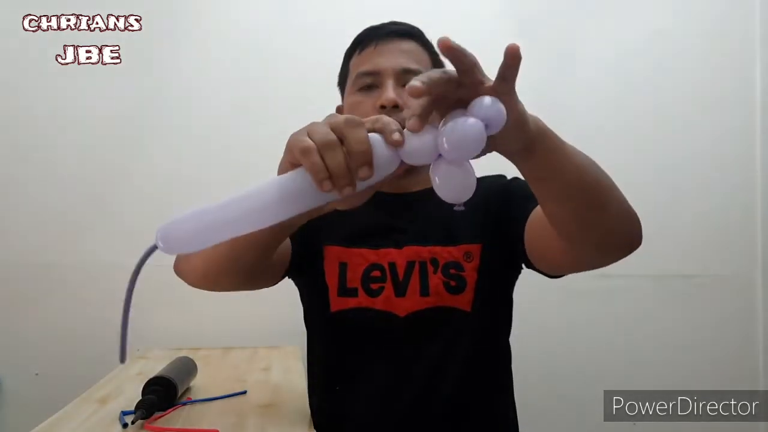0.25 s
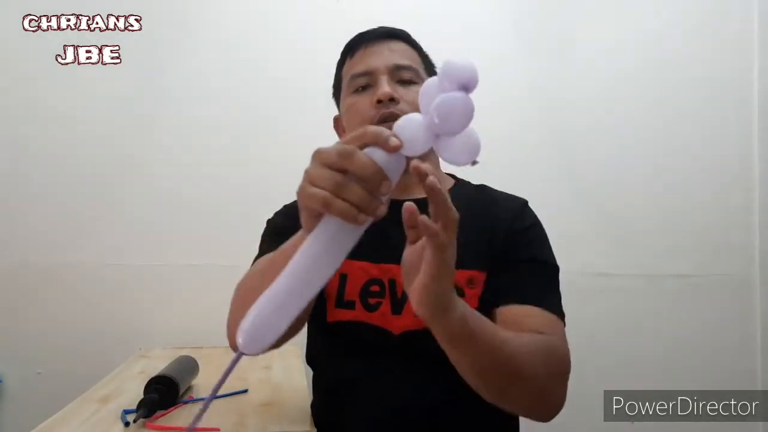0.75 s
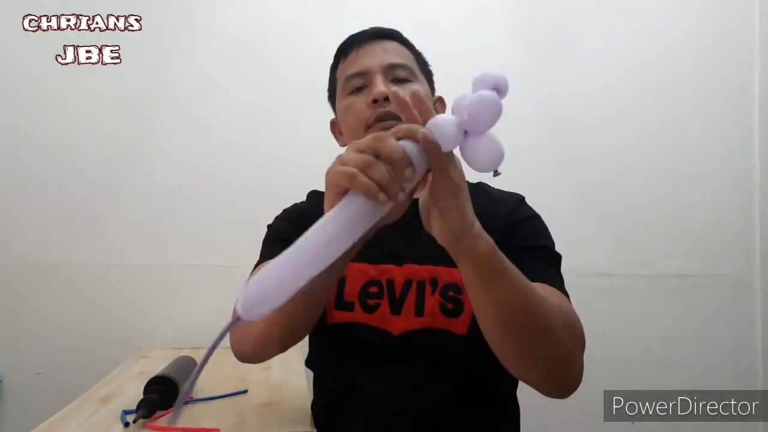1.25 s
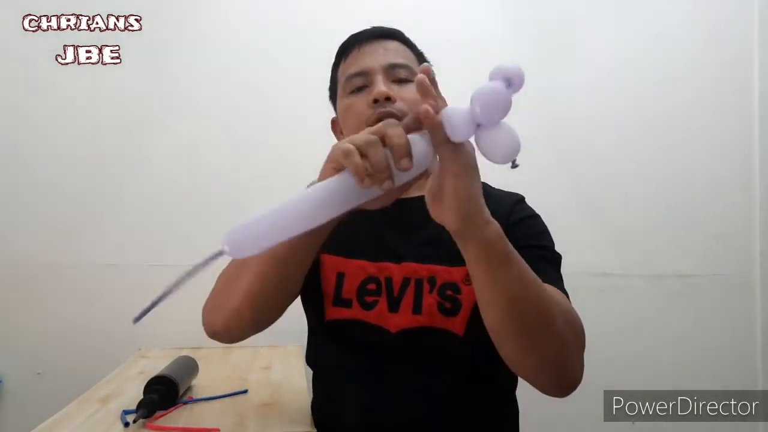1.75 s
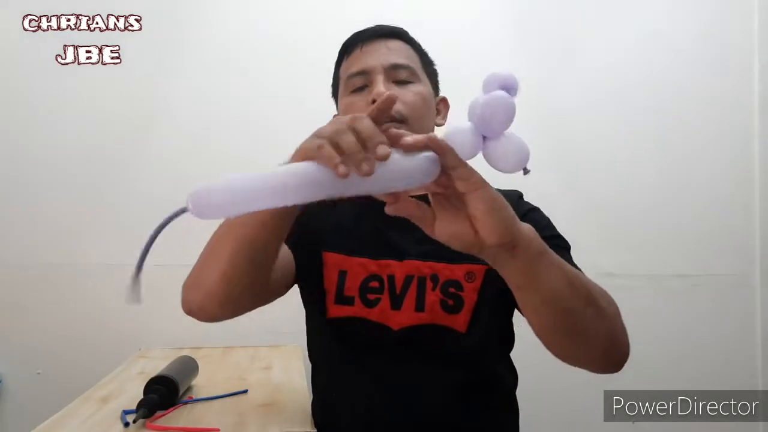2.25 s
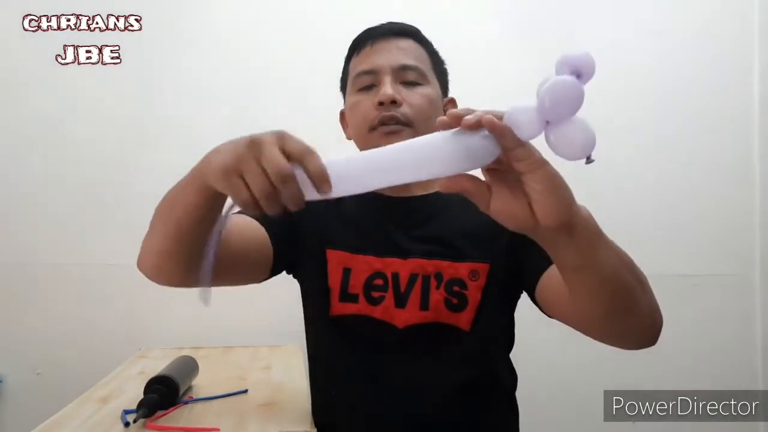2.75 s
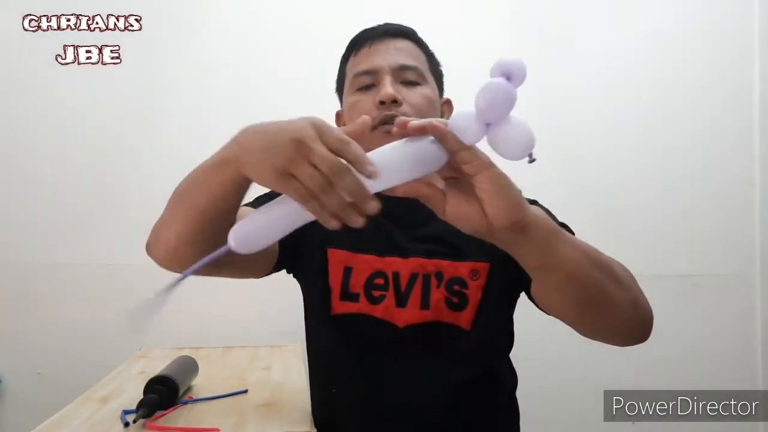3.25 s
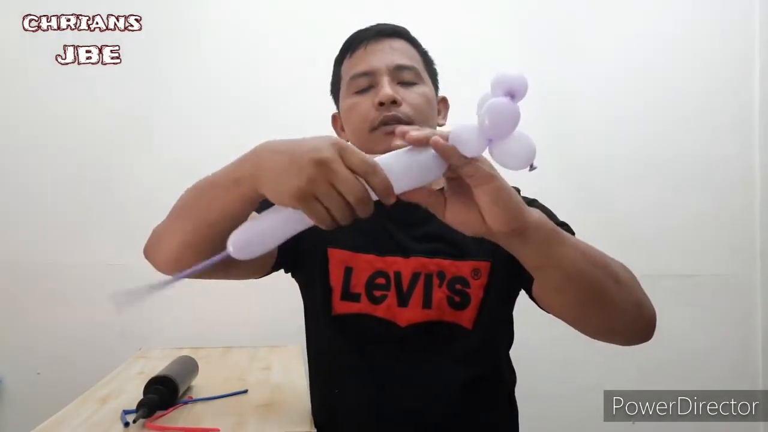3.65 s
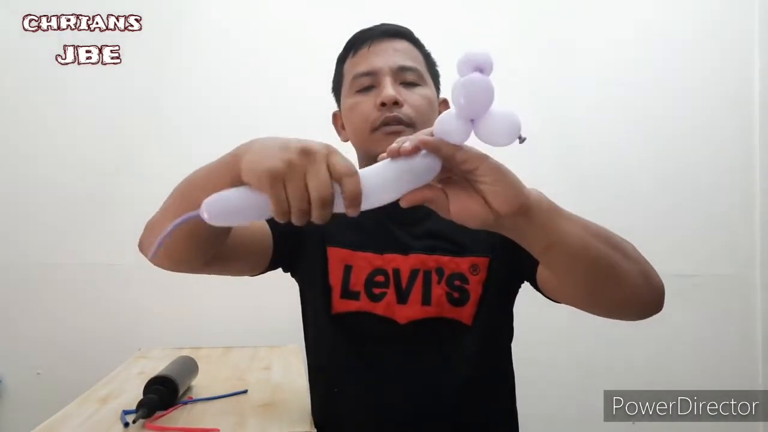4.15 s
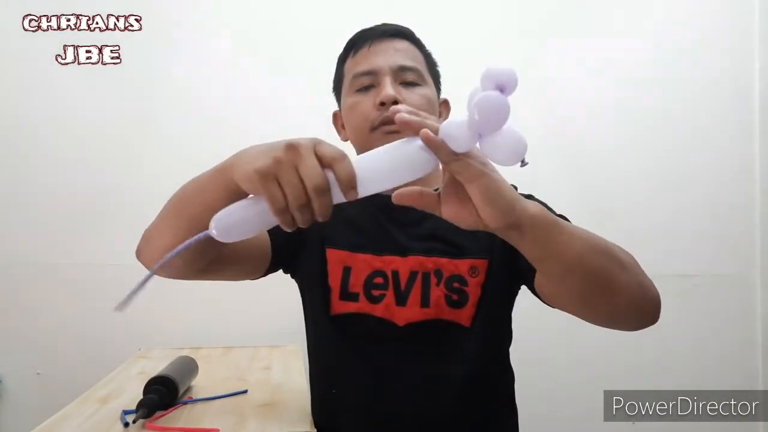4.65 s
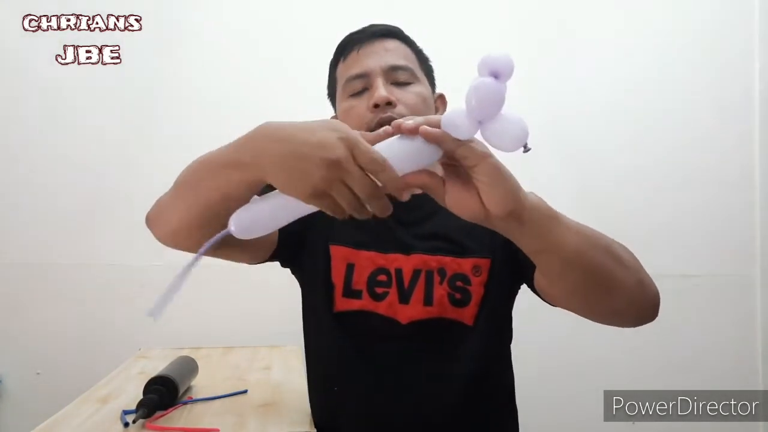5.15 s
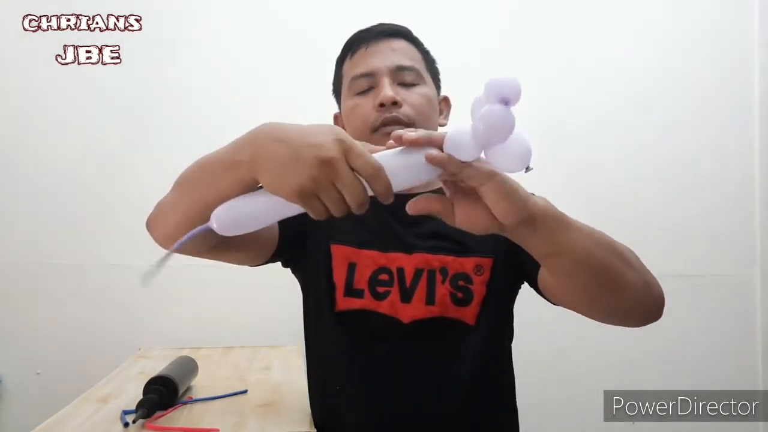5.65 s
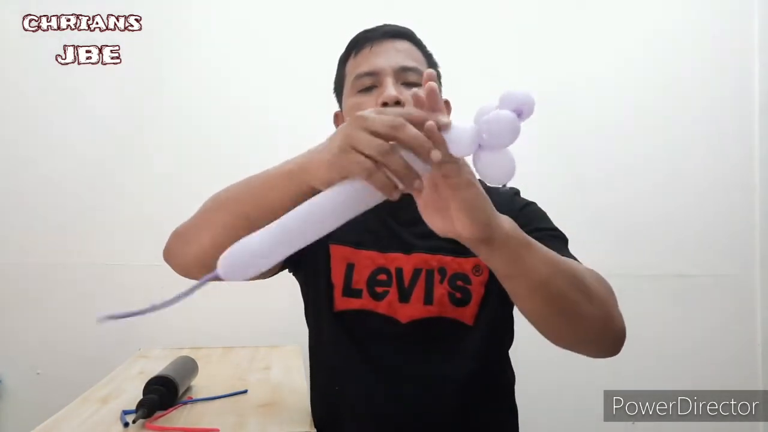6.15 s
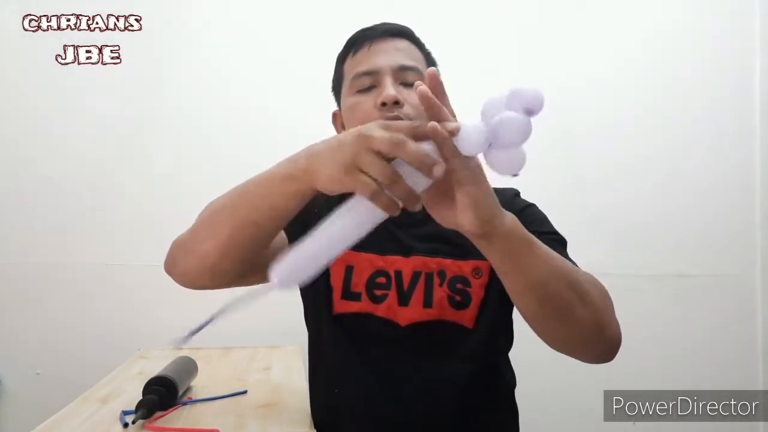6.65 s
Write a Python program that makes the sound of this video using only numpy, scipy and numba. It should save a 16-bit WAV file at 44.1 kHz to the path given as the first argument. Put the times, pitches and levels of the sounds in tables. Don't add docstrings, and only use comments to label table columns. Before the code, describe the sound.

Hands twist a long latex balloon in a small bare room, with irregular rubbery creaks, sharp snaps and brief squeaks over faint low hum.

```python
import sys
import numpy as np
from scipy import signal
from scipy.fft import rfft, irfft, next_fast_len
from scipy.io import wavfile
from scipy.ndimage import uniform_filter1d
from numba import njit

SR = 44100
rng = np.random.default_rng(int(sys.argv[2]) if len(sys.argv) > 2 else 0)


def inscribe(sig):
    pcm = np.round(np.clip(np.atleast_2d(sig).T, -1, 1) * 32767)
    wavfile.write(sys.argv[1], SR, pcm.astype(np.int16))


def makeup_ratio(level_db):
    decades = np.asarray(level_db, float) / 20
    return 10 ** decades


N = 303849
TIME = np.arange(N) / SR

# pitch_hz, level_db (per Hz)
HUM_SPECTRUM = [(24, -50.5), (40, -16.5), (57, -7), (87, -8), (107, -7), (124, -13.5), (172, -17),
                (212, -4.5), (256, -12), (332, -14), (419, -22), (625, -29), (687, -22), (773, -28.5),
                (11000, -45.5), (14300, -80.5), (22000, -120)]
HUM_DB = -64

# start_s, peak_db, bubble_hz, crack_db, treble_db
SNAPS = [(0.105, -22.5, 730, 14.5, 1), (0.386, -21, 834, 8, -9), (1.5, -35.5, 1266, 6.5, -11),
         (1.65, -23.5, 1210, 6.5, -11), (1.72, -15.5, 846, 15.5, -6.5), (1.7605, -10.5, 850, 9, -11),
         (1.893, -9.5, 790, 8.5, -14.5), (2.16, -30, 1290, 13.5, -38), (2.181, -22, 1220, 10, -19.5),
         (2.323, -31, 630, 17, -1.5), (2.362, -9, 740, 8.5, -13.5), (3.028, -14.5, 910, 3, -11),
         (3.467, -26.5, 790, 5.5, -22), (3.832, -18.5, 1056, 11.5, -10.5), (4.521, -19.5, 820, 6, -14),
         (4.547, -26.5, 865, 8.5, -5.5), (4.758, -29, 1190, -1, -18), (4.847, -22, 870, 9, -14.5),
         (5.234, -16.5, 820, 2.5, -34), (5.341, -6, 870, -2.5, -32.5), (5.604, -23, 960, 0, -31),
         (5.638, -16.5, 610, 5, -21.5), (6.676, -13.5, 790, 7, -20.5), (6.704, -14.5, 1130, -13, -32)]
# start_s, peak_db, bubble_hz, treble_db
TICKS = [(1.633, -42.5, 1400, -1), (2.196, -33.5, 860, -15), (2.349, -28, 1130, -1),
         (3.193, -31, 1240, -15.5), (3.301, -44, 786, -20), (3.379, -32.5, 740, -10.5),
         (3.447, -33, 636, -28), (3.794, -29, 900, -25), (4.331, -41.5, 815, -10), (4.896, -48, 850, -27),
         (5.151, -30, 815, -29), (6.213, -47.5, 810, -6.5), (6.307, -41, 1340, -14),
         (6.472, -41, 1000, -14), (6.608, -44, 1130, -22)]
TICK_CRACK_DB = 5.5
CRACK_HZ, CRACK_DB_PER_OCTAVE = 1605, 22.5
RING_CYCLES, RING_DB_PER_HALVING = 2.03, 18.5

# peak_s, rise_s, fall_s, peak_db, patch_hz
GRIPS = [(1.97, 0.15, 0.14, -25.5, 915), (2.372, 0.03, 0.031, -10.5, 1240),
         (3.055, 0.046, 0.045, -15, 1037), (3.382, 0.0045, 0.028, -36, 1280),
         (3.474, 0.043, 0.14, -32, 956), (3.59, 0.038, 0.017, -41.5, 790), (3.958, 0.019, 0.025, -15, 1750),
         (4.074, 0.0085, 0.014, -20, 800), (4.6, 0.084, 0.071, -36, 1156), (5.2, 0.053, 0.12, -29, 1143),
         (5.61, 0.012, 0.11, -34.5, 1100), (5.648, 0.0036, 0.043, -41, 873), (5.758, 0.022, .05, -24, 760),
         (6.4, 0.061, 0.21, -60, 800)]
# peak_s, rise_s, fall_s, peak_db, patch_hz
SLIPS = [(1.896, 0.00098, 0.0064, -14.5, 950), (2.078, .016, 0.023, -23, 1504),
         (2.162, 0.00067, 0.023, -24.5, 1980), (2.398, 0.017, 0.034, -15, 1250),
         (2.504, 0.032, 0.07, -29.5, 1850), (2.812, 0.023, 0.11, -28, 804), (2.97, 0.025, 0.042, -35, 820),
         (3.99, .01, .05, -34, 1800), (4.522, 0.00099, 0.0082, -33, 1170),
         (4.73, 0.057, 0.023, -46.5, 1167), (4.762, 0.0021, 0.04, -31.5, 1107),
         (4.852, 0.00284, 0.098, -24, 924), (5.938, 0.055, 0.032, -28, 1074),
         (6.703, .028, 0.073, -15.5, 1253), (6.87, .04, 0.087, -39.5, 1287)]
# peak_s, rise_s, fall_s, peak_db, patch_hz
SLIDES = [(1.29, 0.018, 0.054, -38, 1780), (1.35, 0.037, 0.085, -33.5, 1470),
          (1.505, 0.0043, 0.096, -44.5, 1750), (1.762, .002, 0.021, -13, 850),
          (1.8, 0.0088, 0.027, -22, 825), (2.184, 0.0028, 0.014, -26, 1940), (2.78, 0.016, .03, -30, 1610),
          (2.9, 0.076, 0.058, -15.5, 778), (3.842, .012, 0.14, -14.5, 1040),
          (4.25, 0.021, 0.08, -42.5, 830), (4.333, .003, 0.095, -39, 1030), (4.466, 0.038, 0.013, -50, 920),
          (5.41, 0.0064, .1, -31, 837), (5.802, 0.029, .1, -22, 803), (6.19, 0.04, 0.034, -45.5, 1640),
          (6.646, 0.042, 0.0071, -33, 1197), (6.763, 0.041, 0.037, -18, 1212)]
# peak_s, rise_s, fall_s, peak_db, patch_hz
BRUSHES = [
    (1.24, 0.057, 0.057, -44.5, 1200),
    (1.55, .05, 0.11, -51, 1750),
    (1.652, 0.0018, 0.046, -32, 1410),
    (2.73, .05, .04, -52.5, 1750),
    (3.8, 0.064, 0.09, -44.5, 1110),
    (6.1, 0.023, 0.13, -52.5, 1650),
    (6.35, .05, 0.14, -56, 1660),
    (6.5, 0.035, 0.14, -50, 1264),
]
# rubs (a table above), bass_db, broad_db, treble_db
TOUCHES = [
    (GRIPS, -3, -8, -13),
    (SLIPS, -2.5, -2, -0.48),
    (SLIDES, -26, -13, -13.5),
    (BRUSHES, -17, -6, 1.8),
]
# pitch_hz, width (over centre), level_db
TUBE_MODES = [(263.3, 0.13, -8), (513, .22, -5.5), (779, .2, -4.5)]
RISE_DB, FALL_DB = 13.5, 17
FLUTTER_DB = 2.5

# start_s, length_s, start_hz, end_hz, level_db
WAILS = [
    (2.355, 0.078, 338.5, 350.7, -25),
    (3.897, .075, 350.1, 335, -19.5),
]
# start_s, length_s, start_hz, end_hz, level_db
BUZZES = [
    (2.467, 0.018, 1774, 1810, -22),
    (2.497, 0.017, 1600, 1736, -20.5),
    (5.755, 0.05, 328, 341.3, -35),
    (6.683, 0.033, 569, 395, -24),
]
# start_s, length_s, start_hz, end_hz, level_db
SQUEAKS = [
    (1.906, 0.048, 520, 250, -33.5),
    (4.057, 0.012, 770, 798, -20.5),
    (3.955, 0.045, 300, 250, -26.5),
    (4.06, 0.024, 485, 475, -31.5),
    (6.768, 0.049, 1088, 990, -36),
]
# start_s, length_s, start_hz, end_hz, level_db
GROANS = [
    (2.791, 0.039, 197, 196, -31.5),
    (3.842, 0.027, 371, 350, -28.5),
    (5.607, 0.027, 264, 250, -38),
    (4.52, 0.03, 505, 470, -37),
    (4.665, 0.12, 412, 268.5, -49),
    (4.9, 0.1, 269, 245.5, -47.5),
    (5.01, 0.12, 226, 257, -52),
    (5.185, 0.045, 271, 257, -32.5),
    (6.63, 0.017, 1220, 1310, -39),
]
# slips (a table above), fall_db (per octave of overtones),
# arch (pitch arch per s of length)
VOICES = [
    (WAILS, 2.74, 2.2),
    (BUZZES, -3, 2.2),
    (SQUEAKS, -10.5, 0.41),
    (GROANS, -20.5, 0.26),
]
TOP_HZ = 15000

# pitch_hz, level_db
WALLS = [(2500, 0), (14000, -3)]
ROOM_T60_S, WALL_ECHO_S, PORT_LAG_S = 0.29, .0062, .00004
PLACE_HOLD_S = .23

# pitch_hz, level_db
MIC = [(100, -11), (300, 0), (5000, 0), (6500, -2), (8000, 5), (9200, -6), (14500, -3), (16200, -31)]
# pitch_hz, left_minus_right_db
PORTS = [(60, 4.5), (380, 2), (3000, 2), (8000, 4), (15000, -3)]


def unit(x):
    return x / np.sqrt(np.mean(x ** 2))


@njit
def band(x, hz, damp):
    y, b, l = np.empty(len(x)), 0., 0.
    for i in range(len(x)):
        g = np.tan(np.pi * hz[i] / SR)
        v = (b + g * (x[i] - l)) / (1 + g * (g + damp))
        b, l, y[i] = 2 * v - b, l + 2 * g * v, damp * v
    return y


def fixed_band(x, hz, damp):
    centre = np.full(len(x), 1. * hz)
    return band(band(x, centre, damp), centre, damp)


def colour(x, table, share=1):
    size = next_fast_len(x.shape[-1])
    hz = np.maximum(np.fft.rfftfreq(size, 1 / SR), 1)
    points_hz, points_db = np.array(table).T
    curve_db = np.interp(np.log(hz), np.log(points_hz), points_db)
    return irfft(rfft(x, size) * makeup_ratio(share * curve_db), size)[..., :x.shape[-1]]


def pair(size, split_hz, most):
    common, own = rng.standard_normal(size), rng.standard_normal((2, size))
    hz = np.fft.rfftfreq(size, 1 / SR)
    alike = np.clip(most, 0, 1) / (1 + (hz / split_hz) ** 2)
    return irfft(np.sqrt(alike) * rfft(common) + np.sqrt(1 - alike) * rfft(own), size)


def hum():
    swell = unit(uniform_filter1d(rng.standard_normal(N), size=9000))
    noise = pair(next_fast_len(N), split_hz=500, most=0.67)
    return makeup_ratio(HUM_DB + 0.65 * swell) * unit(colour(noise, HUM_SPECTRUM)[:, :N])


def snaps():
    out, t = np.zeros(N + 2048), np.arange(2048) / SR
    ticks = [(s, db, hz, TICK_CRACK_DB, treble_db) for s, db, hz, treble_db in TICKS]
    for s, db, hz, crack_db, treble_db in SNAPS + ticks:
        crack_hz = CRACK_HZ * 2 ** (crack_db / CRACK_DB_PER_OCTAVE)
        cycles = RING_CYCLES * 2 ** (-crack_db / RING_DB_PER_HALVING)
        grit = rng.standard_normal(2048) * np.exp(-t / .0003)
        ring = np.sin(2 * np.pi * hz * t) * np.exp(-t * hz / cycles) * (1 - np.exp(-t * hz * 8))
        bubble = 1.24 * fixed_band(ring, 1.19 * hz, 2.4)
        crack = fixed_band(fixed_band(grit, crack_hz, 1.33), crack_hz, 1.42)
        tick = fixed_band(grit, 6500, 1.75)
        parts = bubble + makeup_ratio(crack_db) * crack / abs(crack).max()
        parts += makeup_ratio(treble_db + 16.5) * tick / abs(tick).max()
        out[int((s + .0004) * SR):][:2048] += makeup_ratio(db - 2) * parts
    return out[:N]


def slips(rate_hz, scatter_db):
    count = N // 10
    gaps = rng.gamma(3, 1 / 3, count) * SR / rate_hz
    size = makeup_ratio(scatter_db * rng.standard_normal(count).clip(-2, 2))
    at = np.cumsum(gaps).astype(int)
    signed = size * rng.choice([-1, 1], count)
    return np.bincount(at[at < N], signed[at < N], N)


def creaks():
    level, bass, wide, treble = np.zeros((4, N))
    for rubs, bass_db, broad_db, treble_db in TOUCHES:
        for s, rise, fall, db, _ in rubs:
            span = slice(int((s - rise) * SR), int((s + fall) * SR))
            shape_db = np.interp(TIME[span], [s - rise, s, s + fall], [-RISE_DB, 0, -FALL_DB])
            press = makeup_ratio(db - 8.5 + shape_db)
            level[span] += press
            bass[span] += makeup_ratio(bass_db) * press
            wide[span] += makeup_ratio(broad_db) * press
            treble[span] += makeup_ratio(treble_db) * press
    drift = uniform_filter1d(uniform_filter1d(rng.standard_normal(N), size=400), size=400)
    flutter = makeup_ratio(FLUTTER_DB * unit(drift).clip(-2, 1.5))
    level, bass, wide, treble = (flutter * uniform_filter1d(v, size=120) for v in (level, bass, wide, treble))

    peaks = np.array(sorted(rub for rubs, *_ in TOUCHES for rub in rubs)).T
    patch_hz = np.interp(TIME, peaks[0], peaks[4])
    coarse = slips(rate_hz=600, scatter_db=4.5)
    fine = slips(rate_hz=2000, scatter_db=6.5)
    patch = unit(band(coarse, patch_hz, 0.38))
    broad = band(coarse + 0.13 * fine, 1.5 * patch_hz, 2.9)
    broad = unit(band(band(broad, 1.1 * patch_hz, 3.9), 1.81 * patch_hz, 2.4))
    near = unit(band(band(coarse, 0.85 * patch_hz, 0.97), 0.81 * patch_hz, 0.74))
    tube = unit(fixed_band(coarse, 401, 0.86))
    modes = sum(makeup_ratio(db) * unit(band(coarse, np.full(N, 1. * hz), damp)) for hz, damp, db in TUBE_MODES)
    rustle = unit(fixed_band(fine, 6000, 3.5))
    pressed = level * (0.46 * patch + 0.16 * near) + wide * broad
    return pressed + bass * (0.5 * tube + modes) + treble * rustle


def squeaks():
    out = np.zeros(N)
    for s, length, hz0, hz1, db, fall_db, arch in [(*row, *voice) for rows, *voice in VOICES for row in rows]:
        u = np.linspace(0, 1, int(length * SR))
        waver = uniform_filter1d(rng.standard_normal(8000), size=120)[:len(u)]
        push = 1 + arch * length * np.sin(np.pi * u) + .2 * waver
        turns = np.cumsum((hz0 + (hz1 - hz0) * u) * push) / SR
        k = np.arange(1, 17)[:, None]
        gains = makeup_ratio(fall_db * np.log2(k)) / (1 + (k / 7.6) ** 5) * (k * hz0 < TOP_HZ)
        tone = (gains * np.sin(2 * np.pi * (k * turns - .06 * k ** 2))).sum(axis=0)
        swell = np.sin(np.pi * u ** 1.3) ** .7 * makeup_ratio(25 * waver[::-1])
        out[int(s * SR):][:len(u)] += makeup_ratio(db) * unit(tone) * swell
    return out


def room(x):
    t, out = np.arange(SR // 2) / SR, 0
    rise = np.clip((t - .001) / 0.005, 0, 1)
    place = (TIME / PLACE_HOLD_S).astype(int) % 4
    for k in range(4):
        tail = colour(pair(len(t), split_hz=750, most=1.0), WALLS)
        response = makeup_ratio(-25) * tail * rise * makeup_ratio(-60 * t / ROOM_T60_S)
        response[0, 0] = response[1, round(PORT_LAG_S * SR)] = .92
        echo = int(WALL_ECHO_S * SR) + 6 * k
        response[0, echo] += .55
        response[1, echo - 5] += .45
        share = uniform_filter1d(1. * (place == k), size=2000)
        out = out + signal.fftconvolve((share * x)[None], response, axes=1)[:, :N]
    return out


def scene():
    balloon = makeup_ratio(1) * snaps() + creaks() + squeaks()
    return colour(room(balloon), MIC) + hum()


def roll_off(x):
    return signal.sosfilt(signal.butter(12, 16520, fs=SR, output="sos"), x)


def record(dry):
    ports = np.array([colour(dry[0], PORTS, 0.64), colour(dry[1], PORTS, -1.22)])
    rounded = ports / (1 + ports ** 4) ** .25
    return roll_off(rounded)


dry = scene()
out = record(dry)
inscribe(out)
```